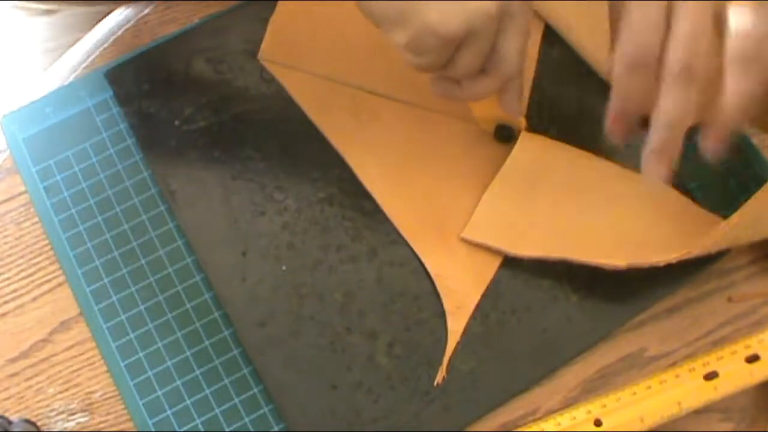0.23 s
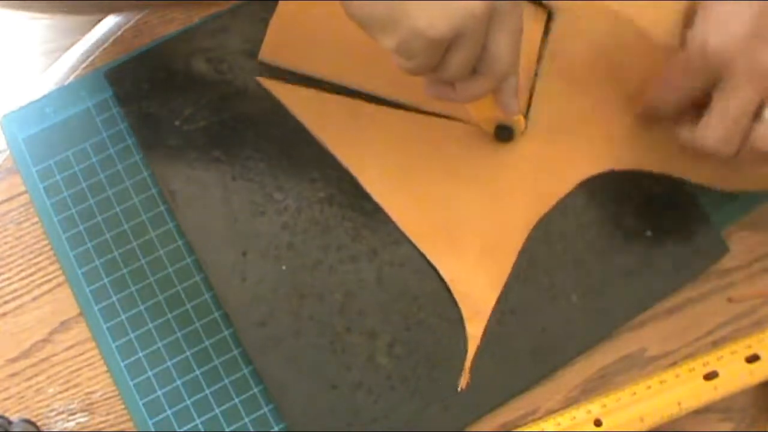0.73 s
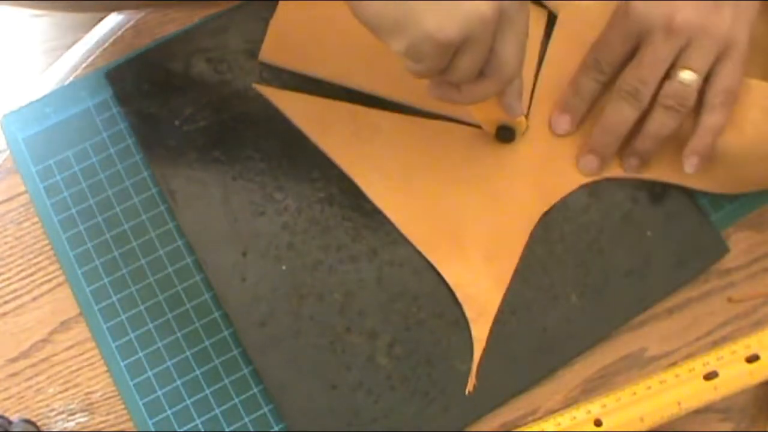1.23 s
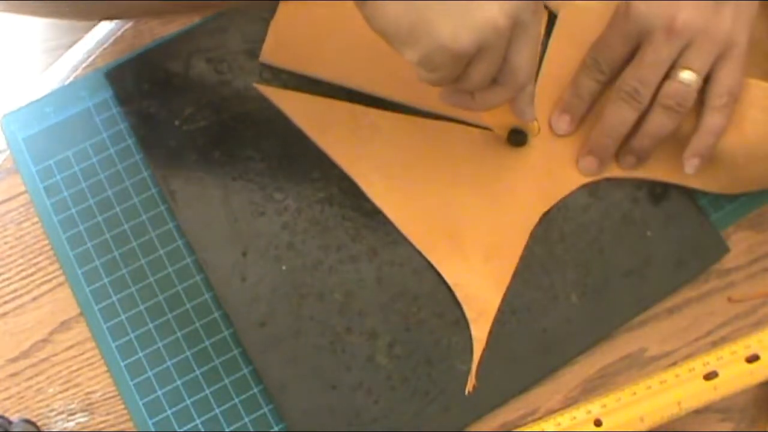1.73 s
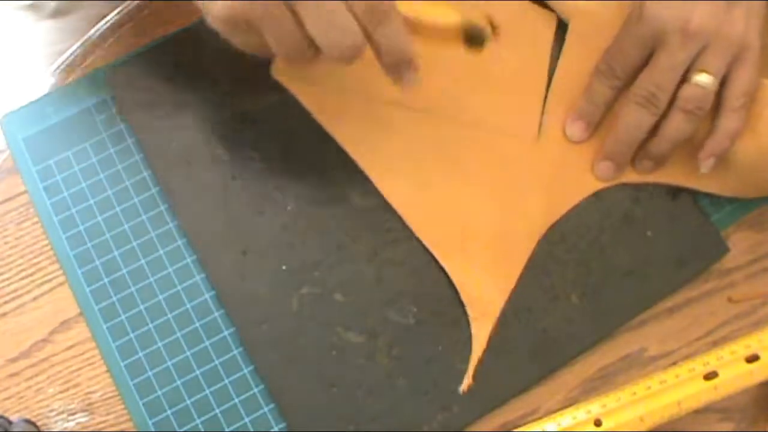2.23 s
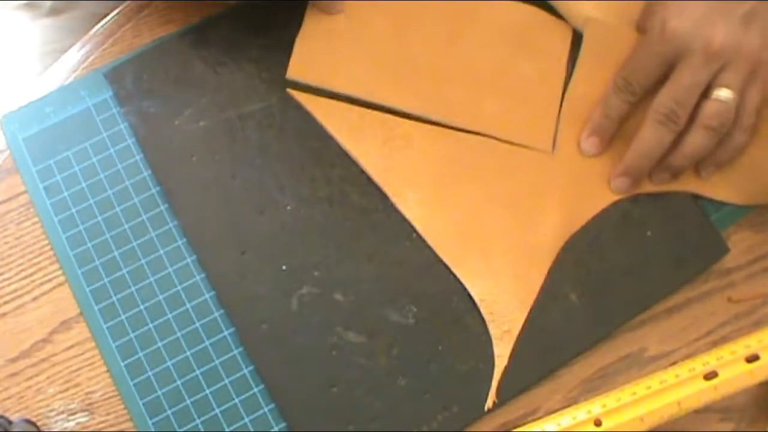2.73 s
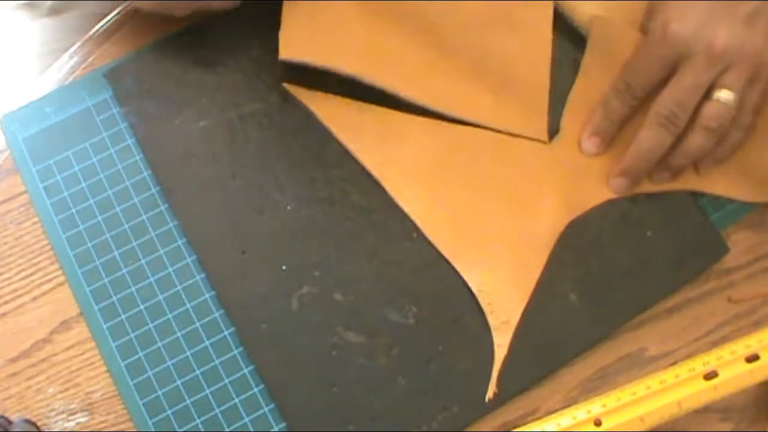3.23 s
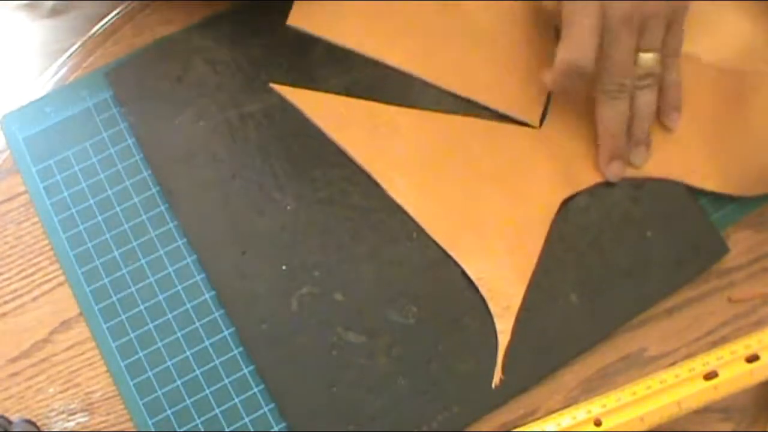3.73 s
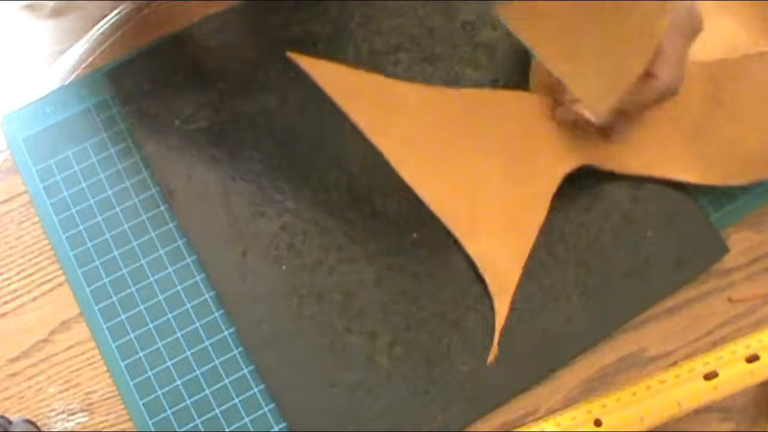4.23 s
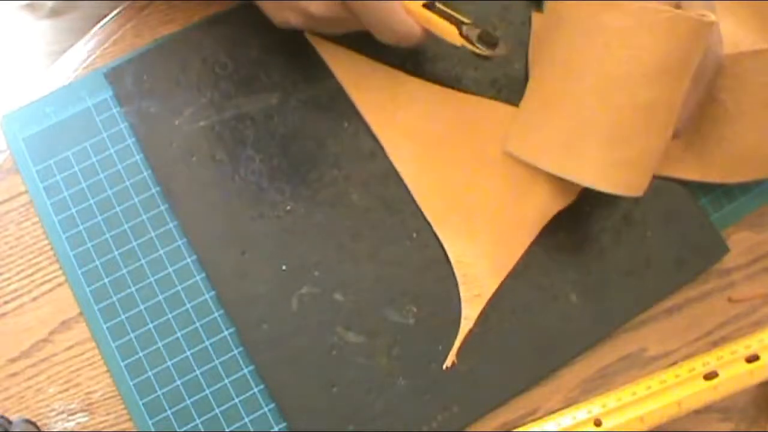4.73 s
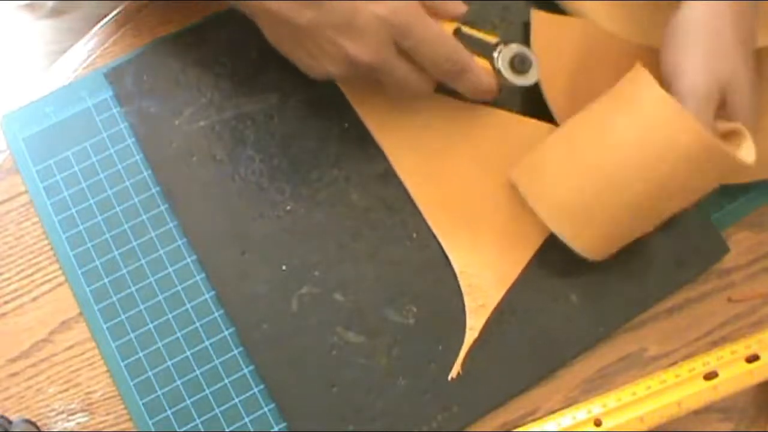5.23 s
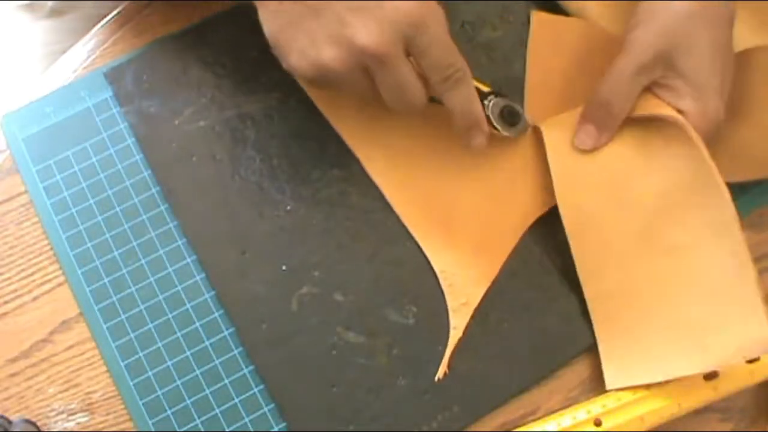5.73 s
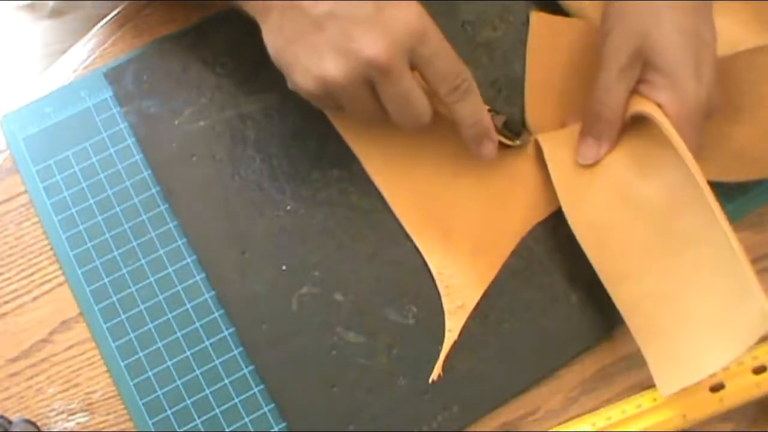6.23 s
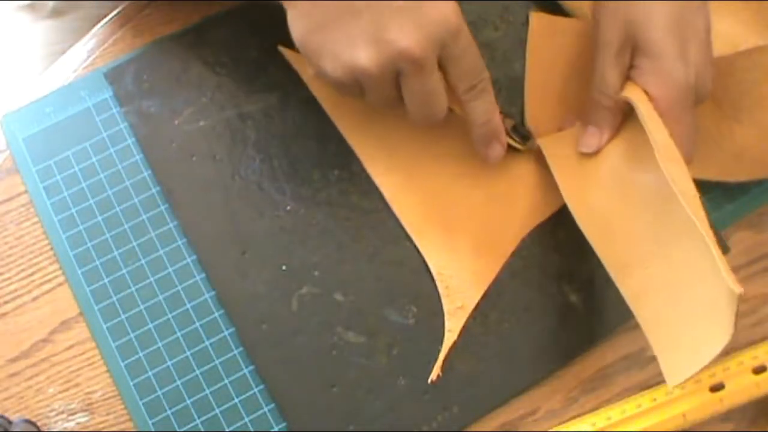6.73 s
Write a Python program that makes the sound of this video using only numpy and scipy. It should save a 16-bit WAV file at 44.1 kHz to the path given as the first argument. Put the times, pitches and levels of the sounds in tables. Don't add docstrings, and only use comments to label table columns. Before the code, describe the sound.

Close-up leatherwork indoors: soft scuffs, a drumming flop of hide on the board, a quieter spell with faint creaks, another small thump, then busy leather sliding with light knocks and blade ticks. Near the end a sharp, bright cutter latch clacks and clatters for a moment, and the hum remains. Small camera microphone with slight hiss and thin whine.

```python
import sys
import numpy as np
from scipy import signal
from scipy.fft import rfft, irfft
from scipy.io import wavfile
from scipy.ndimage import uniform_filter1d

SR = 44100
rng = np.random.default_rng(int(sys.argv[2]) if len(sys.argv) > 2 else 0)


def bounce(signal):
    frames = np.transpose(np.atleast_2d(signal))
    limited = np.clip(frames, -1, 1)
    pcm = np.round(limited * 32767).astype(np.int16)
    wavfile.write(sys.argv[1], SR, pcm)


def level_to_linear(level):
    exponent = np.asarray(level, float) / 20
    return 10 ** exponent


N = 307377
T = np.arange(N) / SR
STEP = 64
LEFT_RIGHT = np.array([[1], [-1]])


def unit(x):
    return x / np.sqrt(np.mean(x ** 2))


def noise():
    return rng.standard_normal(N)


def colour(x, points):
    hz, db = np.transpose(points)
    f = np.maximum(np.arange(N // 2 + 1) * SR / N, 1)
    gain = level_to_linear(np.interp(np.log(f), np.log(hz), db))
    return irfft(rfft(x) * gain, N)


def band(x, hz, width):
    b, a = signal.iirpeak(hz, hz / width, fs=SR)
    return signal.lfilter(b, a, x)


def steep(x, hz, width):
    return unit(band(band(x, hz, width), hz, width))


def butter(x, order, hz, kind="low"):
    return signal.sosfilt(signal.butter(order, hz, kind, fs=SR, output="sos"), x)


def walk(rate):
    hold = int(SR / rate)
    held = np.repeat(rng.standard_normal(N // hold + 1), hold)
    return 1.099 * uniform_filter1d(uniform_filter1d(held, hold), hold)[:N]


def wandering_tone(hz, wander_hz, rate):
    return np.sqrt(2) * np.sin(2 * np.pi * np.cumsum(hz + wander_hz * walk(rate)) / SR)


def grains(rate, spread_db):
    chance, size, sign = rng.random(N), rng.exponential(1, N), rng.standard_normal(N)
    return unit((chance < rate / SR) * level_to_linear(spread_db * size) * sign)


def swells(rows):
    t = T[::STEP]
    roundness = 1.62
    envelopes = []
    for s, db, up_ms, down_ms, *_ in rows:
        away = np.where(t < s, 1e3 * (s - t) / up_ms, 1e3 * (t - s) / down_ms)
        envelopes.append(level_to_linear(db - 10 * away ** roundness))
    return envelopes


def together(moves, colours_db):
    power = sum((e * level_to_linear(db)) ** 2 for e, db in zip(moves, colours_db))
    return np.interp(T, T[::STEP], np.sqrt(power))


def add(out, s, sound):
    i = int(s * SR)
    out[i:i + len(sound)] += sound[:N - i]


def ring(hz, t60):
    t = T[:8192]
    return np.sin(2 * np.pi * hz * t) * 1000. ** (-t / np.clip(t60, .003, .18))


def puff(length):
    return rng.standard_normal(4096) * np.exp(-T[:4096] / length)


# frequency in Hz, level in dB per Hz.
AIR = [(15, -57), (25, -20), (140, -12), (179, -7), (210, -21.5), (241, -11), (291, -18), (413, -14.5),
       (788, -23.5), (854, -24.5), (926, -24.5), (1630, -30), (1970, -36.5), (2440, -37), (6000, -40.5),
       (15700, -40)]
# frequency in Hz, level in dB per Hz.
AIR_SIDE = [(15, -61), (25, -34), (148, -17), (184, -11), (788, -8), (854, -7), (1150, -11.5), (1680, -14),
            (1820, -14), (11100, -32), (15700, -35.5)]


def hiss():
    mid = level_to_linear(-49.5 + 0.55 * walk(3.15)) * unit(colour(noise(), AIR))
    side = level_to_linear(-56.5) * unit(colour(noise(), AIR_SIDE))
    return mid, side


# frequency in Hz, width in Hz, rms level in dB.
DRONE = [(169.3, 11.7, -50.5), (189.9, 7.8, -50), (147.8, 11.6, -52.5), (120, 14, -59.5),
         (220.4, 7.7, -60.5), (232.8, 3.9, -64.5), (409, 67, -55), (529, 1.7, -67.5)]
# frequency in Hz, wander in Hz, rms level in dB.
HUM = [(172.1, 1.523, -45), (186.8, 1.848, -48.5)]


def appliance():
    out = np.zeros(N)
    for hz, width, db in DRONE:
        out += level_to_linear(db) * unit(band(band(noise(), hz, width), hz, 2.55 * width))
    for hz, wander_hz, db in HUM:
        out += level_to_linear(db + walk(6)) * wandering_tone(hz, wander_hz, 4)
    return out


# frequency in Hz, wander in Hz, mid level in dB,
# side level in dB, start in seconds, end in seconds.
WHINES = [
    (839.8, 1.5, -68, -66, -1, 8),
    (1922, 30, -75, -88, 2.9, 4.75),
    (2880, 35, -88, -74, 2.35, 4.75),
]


def camera_whines():
    mid, side = np.zeros(N), np.zeros(N)
    for hz, wander_hz, mid_db, side_db, start, end in WHINES:
        fade = np.clip(np.minimum(T - start, end - T) / 0.033, 0, 1)
        whine = wandering_tone(hz, wander_hz, 25) * fade
        mid += level_to_linear(mid_db) * whine
        side += level_to_linear(side_db) * whine
    return mid, side


def background():
    hiss_mid, hiss_side = hiss()
    whine_mid, whine_side = camera_whines()
    mid = hiss_mid + appliance() + whine_mid
    return mid * level_to_linear([[-.15], [.15]]) + (hiss_side + whine_side) * LEFT_RIGHT


# peak in seconds, peak level in dB, milliseconds to swell 10 dB,
# milliseconds to fade 10 dB.
BRUSHES = [
    (.221, -66, 250, 332),
    (2.401, -61, 120, 350),
    (4.051, -68, 220, 220),
    (4.651, -63.5, 320, 140),
]


def brushes():
    cloth = steep(noise(), 1620, 800) * level_to_linear(1.8 * walk(20))
    return cloth * together(swells(BRUSHES), np.zeros(len(BRUSHES)))


# frequency in Hz, width in Hz.
RUSTLE_BANDS = [(5230, 5630), (9300, 5800), (2530, 3450)]
# time in seconds, level in dB.
HANDLING = [(0, -66), (.55, -77), (.62, -63), (1.05, -64), (1.14, -77), (2.03, -87), (2.12, -71),
            (2.5, -73), (2.7, -67), (3.25, -64), (3.6, -58.5), (4.3, -67), (4.42, -67), (4.85, -61),
            (5.3, -62.5), (5.75, -65), (5.85, -71), (6.8, -77)]
# peak in seconds, peak level in dB, milliseconds to swell 10 dB,
# milliseconds to fade 10 dB, brightness in dB.
SLIDES = [(.201, -66.5, 30, 30, 0), (.481, -57.5, 28, 24, -2), (.602, -58, 33, 60, 1.5),
          (.666, -57, 20, 30, -3), (1.081, -60, 100, 42, -0.5), (2.321, -53.5, 135, 107, -2),
          (2.783, -56.5, 79, 33, -1), (2.886, -60, 26, 80, -3.5), (3.056, -64.5, 38, 110, 1.5),
          (3.335, -58.5, 56, 140, 4), (3.531, -54, 78, 80, -1), (3.591, -55.5, 62, 60, -2),
          (3.776, -64, 40, 35, 5), (3.869, -55.5, 35, 37, -4), (3.971, -57, 45, 140, -3),
          (4.201, -58, 108, 90, -1), (4.306, -54.5, 63, 45, -5), (4.641, -58.5, 61, 90, -2.5),
          (4.945, -60.5, 80, 168, 0.5), (5.131, -62, 60, 120, -4), (5.371, -63, 52, 69, -3),
          (5.581, -61, 140, 80, 0.5), (5.741, -65, 45, 45, 2), (6.968, -65, 150, 30, -2)]
CREAKS = [
    (.771, -61, 110, 126, 1),
    (1.335, -67, 30, 60, -8),
    (1.501, -64.5, 53, 53, -12),
    (1.655, -67, 35, 30, -2),
    (2.536, -66, 30, 90, -10),
    (5.986, -62.5, 86, 45, -4),
    (4.386, -63, 20, 30, -12),
]


def rustle():
    handling = level_to_linear(np.interp(T[::STEP], *np.transpose(HANDLING)))
    moves = [handling, *swells(SLIDES), *swells(CREAKS)]
    middle_db = np.zeros(len(moves))
    bright_db = [-3] + [row[4] for row in SLIDES + CREAKS]
    body_db = np.array([-1.5] + [-5] * len(SLIDES) + [9.5] * len(CREAKS)) - 3
    slips = grains(9000, spread_db=1.5)
    levels = [together(moves, db) for db in (middle_db, bright_db, body_db)]
    mid = np.zeros(N)
    for (hz, width), level in zip(RUSTLE_BANDS, levels):
        mid += steep(slips, hz, width) * level * level_to_linear(walk(30))
    return mid + level_to_linear(-13) * np.roll(mid, 37) * LEFT_RIGHT


# frequency in Hz, width in Hz, level in dB.
BOARD = [(247, 80, -8), (277.5, 2.2, 4.5), (317, 24, 1), (367, 9.5, 2.5), (438, 36, -1), (521, 20, -4.5),
         (548, 19, -3.5), (641.6, 15.6, 1), (696, 13.5, -1), (761, 33, -7.5), (964, 82, -7), (1143, 39, -6),
         (1236, 64, -18)]
# peak in seconds, peak level in dB,
# milliseconds to swell 10 dB, milliseconds to fade 10 dB, slap level in dB.
FLOPS = [(.656, -40, 39, 90, -15.5), (.751, -35, 90, 60, -13), (.815, -32, 38, 44, -25),
         (.861, -38.5, 20, 40, -21), (.976, -39, 15, 63, -16), (1.311, -54, 15, 50, -16),
         (1.521, -49.5, 57, 35, -15), (2.361, -53.5, 80, 30, -11), (2.421, -53, 30, 40, -14),
         (2.549, -38, 16, 50, -12.5), (2.751, -55, 72, 18, -21)]


def flops():
    moves = swells(FLOPS)
    drum = together(moves, np.zeros(len(moves)))
    face = together(moves, [row[4] for row in FLOPS])
    shared = grains(1500, spread_db=0.5)
    sides = []
    for pan_db in (-0.75, 0.75):
        push = shared + 0.45 * grains(1500, spread_db=0.5)
        soft = butter(push, 2, 1100)
        body = np.zeros(N)
        for k, (hz, width, db) in enumerate(BOARD):
            body += (-1) ** k * level_to_linear(db) * band(soft, hz, width)
        slap = steep(butter(push, 4, 2200), 1300, 1600)
        sides.append((unit(body) * drum + slap * face) * level_to_linear(pan_db))
    return np.array(sides)


# time in seconds, level in dB.
DROPS = [
    (0.9632, -32),
    (.972, -33),
    (2.5337, -36),
    (2.548, -36.5),
]


def drops():
    out = np.zeros(N)
    for s, db in DROPS:
        chance = rng.standard_normal((len(BOARD), 2))
        for (hz, width, mode_db), (a, b) in zip(BOARD, chance):
            level = level_to_linear(db - 9.5 + 0.48 * mode_db + 5.1 * a)
            add(out, s, level * np.sign(b) * ring(hz, 1.56 / width))
    return out * level_to_linear([[-1.2], [1.2]])


# time in seconds, peak level in dB, ring frequency in Hz,
# seconds for the ring to die by 60 dB, thud level in dB.
KNOCKS = [(.9637, -42.5, 3460, 0.02, 4), (.9645, -35.5, 3474, 0.035, -14), (.966, -50, 4570, 0.015, -18),
          (0.9636, -37.5, 1500, 0.022, -15), (0.9647, -41, 2410, 0.02, -20), (2.105, -49.5, 2020, 0.011, 6),
          (2.11, -46, 4100, 0.02, -6), (2.5329, -42.5, 2600, 0.014, 6.5), (2.7806, -40.5, 1600, 0.018, 1.5),
          (3.5562, -46, 2420, 0.015, 2.5), (4.171, -46, 1500, 0.021, -3), (4.3877, -50, 3400, 0.016, -6),
          (5.539, -50, 1610, 0.018, 2), (6.001, -34, 3640, 0.019, -2.5), (6.001, -42, 5030, 0.028, -17),
          (6.011, -41, 7200, 0.034, -25), (2.212, -51, 2780, 0.011, -3)]


def knocks():
    out = np.zeros(N)
    for s, db, hz, t60, thud_db in KNOCKS:
        add(out, s, level_to_linear(db) * ring(hz, t60) * np.clip(T[:8192] / 0.00041, 0, 1))
        thud = band(band(puff(0.0048), 1500, 2800), 1400, 2600)
        add(out, s, level_to_linear(db + thud_db) * 2.14 * thud)
    return out


# time in seconds, peak level in dB, centre in Hz,
# length in seconds, width as a share of the centre.
TICKS = [(0.478, -44, 8920, 0.0017, 0.98), (6.0003, -42, 8000, 0.0033, 1), (0.658, -41.5, 7000, 0.0044, 1),
         (0.7218, -38, 5530, 0.0022, 0.95), (2.0472, -36, 9710, 0.0013, 0.8),
         (2.115, -39, 4200, 0.0015, 0.8), (2.38, -41, 4160, 0.0015, 0.8), (2.784, -37, 5870, 0.0026, 0.91),
         (2.871, -43, 10200, 0.0019, 0.74), (3.5744, -29.5, 7070, 0.0017, 0.25),
         (3.863, -38, 5840, 0.0018, 0.62), (4.9362, -33.5, 5600, 0.0013, 0.96)]


def ticks():
    out = np.zeros(N)
    for s, db, hz, length, share in TICKS:
        crack = band(band(puff(length), hz, share * hz), hz, 1.1 * share * hz)
        add(out, s, level_to_linear(db + 2) * crack)
    return out


# time in seconds, peak level in dB, handle level in dB,
# blade level in dB.
SNAP = [(6.0252, -10, -25, -2), (6.0288, -14.5, -6, 7), (6.0328, -9.5, 1, -11), (6.0373, -18, 1, -11),
        (6.0423, -16.5, -30, 4), (6.05, -24, -22, -17), (6.0527, -30, -22, -7), (6.06, -20.5, -22, -3),
        (6.0741, -28, -23, -18), (6.0792, -25, -20, -15), (6.0795, -15.5, -12, -11),
        (6.085, -22.5, 3.5, -13), (6.0923, -25, -12, -15), (6.0984, -27, -4, -13), (6.1106, -29, -11, -18),
        (6.1214, -31.5, 9, -13), (6.1322, -24, -12, -15), (6.1444, -42, -14, -9)]
# frequency in Hz, level in dB, seconds to die by 60 dB.
CUTTER = [(1204, -7, 0.026), (1532, 2.5, 0.023), (1738, -4.5, 0.045), (2280, -9, 0.01), (2750, -11, 0.019),
          (3100, -21, 0.02), (3400, -3, 0.023), (3920, -4, 0.014), (4730, -6, 0.025), (5200, -5, 0.02),
          (5600, -7, 0.028), (6040, -7.5, .02), (8900, -10, .02), (10200, -1.5, .02), (10600, -5.5, 0.02),
          (11700, -8, .025), (11500, -8, .025), (13200, -8, 0.023), (14200, -12, .02)]
# frequency in Hz, level in dB per Hz.
CRACK = [(300, -65), (600, -10.5), (1000, -4.5), (1500, -15), (2100, -10.5), (3200, -6.5), (5500, -8.5),
         (6600, -10), (8000, -11.5), (10200, -10), (12500, -16), (14300, -21), (15700, -22)]


def snap():
    rings, cracks = np.zeros(N), np.zeros(N)
    for s, db, handle_db, blade_db in SNAP:
        chance = rng.standard_normal((len(CUTTER), 3))
        for (hz, mode_db, t60), (a, b, c) in zip(CUTTER, chance):
            part_db = np.interp(hz, [1900, 2600, 7000, 8500], [handle_db, 0, 0, blade_db])
            level = level_to_linear(db - 8 + mode_db + part_db + 2.2 * a)
            late = .0012 * abs(c)
            add(rings, s + late, level * ring(hz * (1 + 0.023 * b), t60))
        add(cracks, s, level_to_linear(db - 0.5) * puff(0.0042))
    both = rings + level_to_linear(2) * colour(cracks, CRACK)
    return butter(both, 2, 450, "high")


# frequency in Hz, seconds to die by 60 dB.
ROOM_T60 = [(200, 0.39), (1000, 0.44), (4000, 0.31), (12000, 0.31)]


def room(x):
    hz, t60 = np.transpose(ROOM_T60)
    t, tail = T[:30000], 0
    for f in 180 * 2. ** np.arange(0, 6.6, .5):
        mid = band(rng.standard_normal(len(t)), f, f / 3.9)
        side = band(rng.standard_normal(len(t)), f, f / 3.9)
        fade = 1000. ** (-t / np.interp(np.log(f), np.log(hz), t60))
        fade = fade * np.clip(t / 0.0012, 0, 1)
        tail = tail + fade * (mid + 0.25 * side * LEFT_RIGHT)
    tail = tail * level_to_linear(-2.5) / np.sqrt(np.sum(tail ** 2) / 2)
    return signal.fftconvolve(x * np.ones((2, 1)), tail, axes=1)[:, :N]


def scene():
    hits = knocks() + ticks() + snap()
    lean = level_to_linear(-12) * np.roll(band(hits, 12000, 5800), 11) - level_to_linear(-45) * hits
    work = hits + lean * LEFT_RIGHT + flops() + drops()
    return background() + brushes() + rustle() + work + room(work)


def band_limit(x):
    return signal.sosfilt(signal.butter(12, 16030, fs=SR, output="sos"), x)


def record(dry):
    top_cut = signal.ellip(10, .2, 70, 15700, fs=SR, output="sos")
    return band_limit(signal.sosfilt(top_cut, dry))


dry = scene()
out = record(dry)
bounce(out)
```